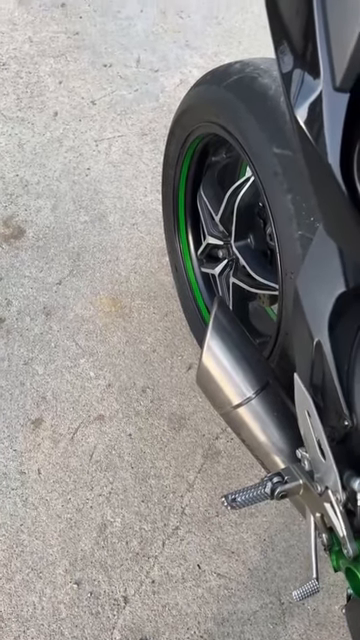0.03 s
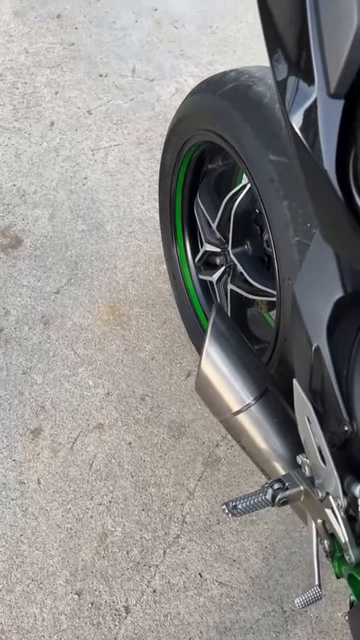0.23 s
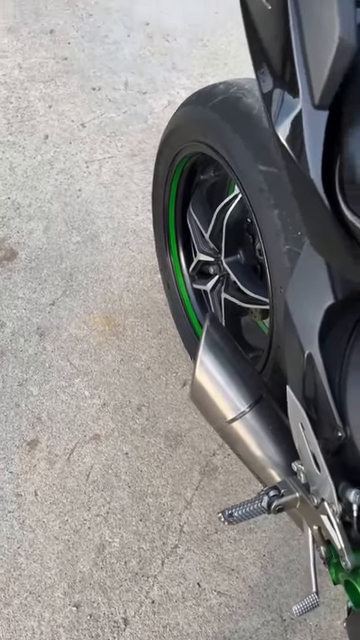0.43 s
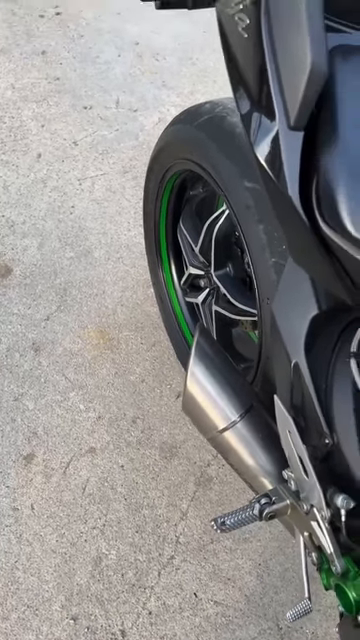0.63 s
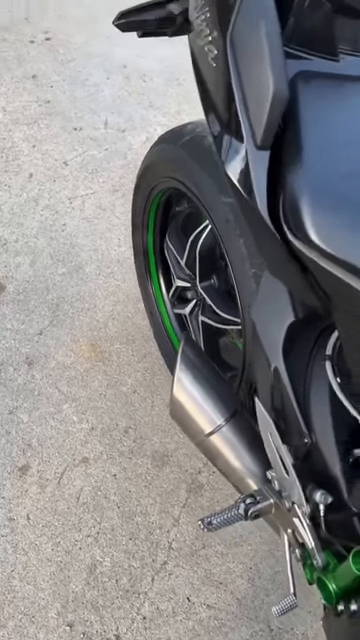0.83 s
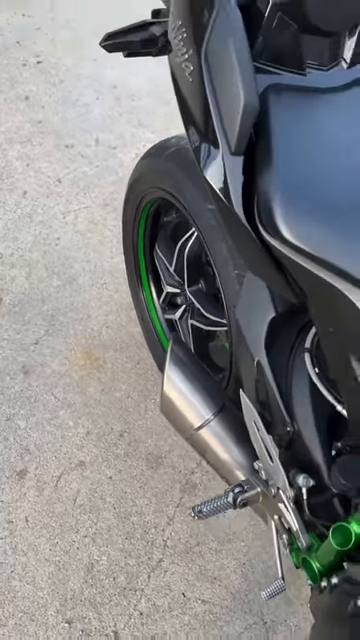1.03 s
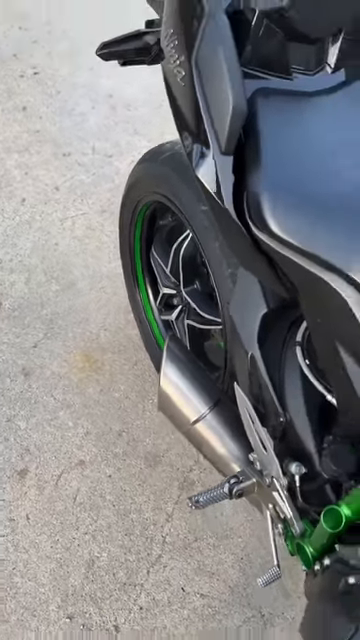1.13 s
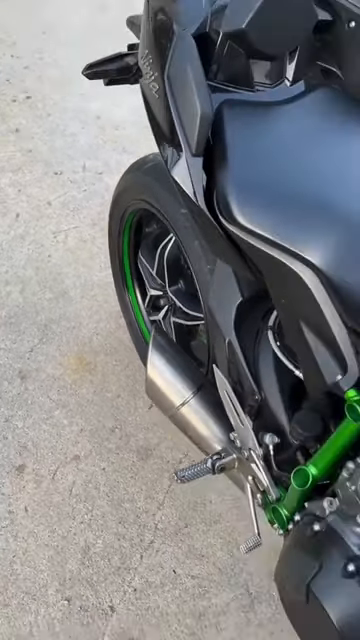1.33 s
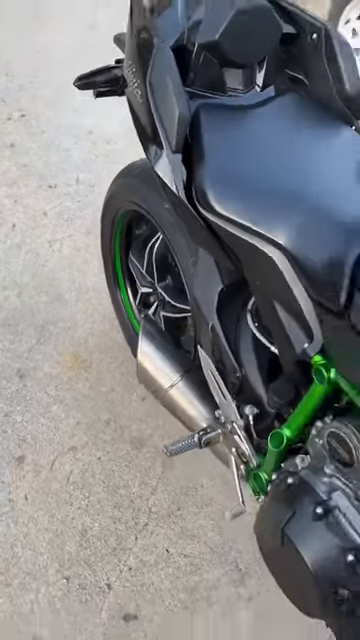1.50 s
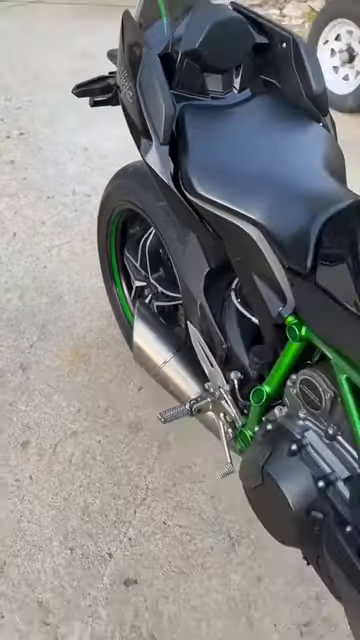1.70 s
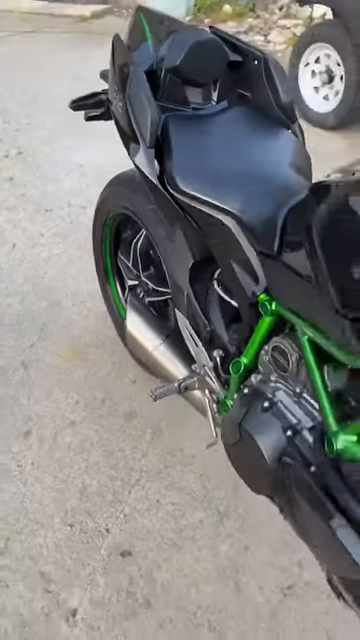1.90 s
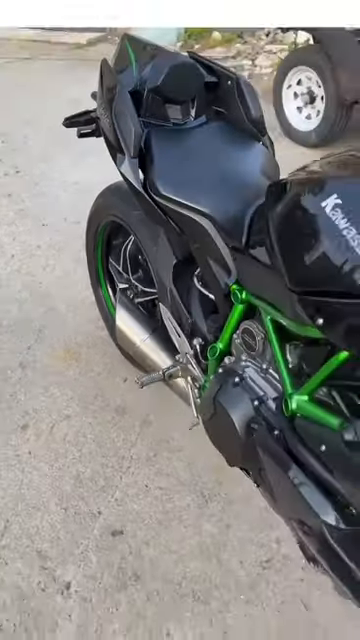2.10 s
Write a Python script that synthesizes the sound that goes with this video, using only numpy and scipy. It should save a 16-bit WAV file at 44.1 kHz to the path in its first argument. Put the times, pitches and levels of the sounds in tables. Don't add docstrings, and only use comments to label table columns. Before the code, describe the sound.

A four-cylinder motorcycle idles quietly close to a phone, is blipped into a short, hard, raspy rev, hums briefly as the throttle shuts, pops one loud backfire, then burbles down and fades in an open concrete yard.

```python
import sys
import numpy as np
from scipy import signal
from scipy.io import wavfile
from scipy.ndimage import uniform_filter1d

SR = 44100
rng = np.random.default_rng(int(sys.argv[2]) if len(sys.argv) > 2 else 0)


def wav_record(signal):
    frames = np.transpose(np.atleast_2d(signal))
    bounded = np.clip(frames, -1, 1)
    quanta = np.round(bounded * 32767).astype(np.int16)
    wavfile.write(sys.argv[1], SR, quanta)


def gain_from_decibels(decibels):
    exponent = np.asarray(decibels, float) / 20
    return 10 ** exponent


N = 94815

OPEN_S, SHUT_S = 0.215, 0.389
CUT_S, RELIGHT_S = 0.414, 0.65


def evened(x):
    return x / np.sqrt(np.mean(x ** 2) + 1e-20)


def read(points, hz):
    f, value = np.transpose(points)
    return np.interp(np.log(hz + 1), np.log(f + 1), value)


def between(start_s, end_s, edge_s):
    t = np.arange(N) / SR
    rise = np.clip((t - start_s) / edge_s + .5, 0, 1)
    fall = np.clip((end_s - t) / edge_s + .5, 0, 1)
    return rise * fall


def resonate(x, hz, width):
    turn = np.exp(2j * np.pi * np.cumsum(hz * np.ones(len(x))) / SR)
    r = np.exp(-np.pi * width / SR)
    return 2 * (turn * signal.lfilter([1 - r], [1, -r], x / turn)).real


def resonate_twice(x, hz, width):
    return resonate(resonate(x, hz, width), hz, width)


def noise(points, patchy_db):
    frames, hz = N // 128 + 5, np.fft.rfftfreq(512, 1 / SR)
    real, imag, patches = rng.standard_normal((frames, 257, 3)).T
    patches = uniform_filter1d(patches, size=5, axis=0)
    patches = evened(uniform_filter1d(patches, size=16, axis=1))
    gain = gain_from_decibels(read(points, hz)[:, None] + patchy_db * patches)
    return evened(signal.istft((real + 1j * imag) * gain, nperseg=512, noverlap=384)[1][:N])


def drift(size):
    return evened(uniform_filter1d(uniform_filter1d(rng.standard_normal(N), size), size))


# time in seconds, firing rate in Hz, then levels in dB of the firing tone,
# the even burns, the uneven burns and the machinery.
BLIP = [(0, 68.34, -35, -26.5, -31, -52.5), (.15, 78.56, -35.5, -65, -27.5, -58),
        (.2, 106.9, -29, -25.5, -20, -53.5), (.232, 131.4, -21.5, -22, -12, -44.5),
        (.296, 192.7, -18, -18, -16, -37.5), (0.327, 219.3, -18.5, -13.5, 1, -34.5),
        (.372, 246.2, -18.5, -20.5, -28, -42), (0.393, 234.8, -19.5, -45, -0.5, -43),
        (.45, 224.2, -22, -29, -45, -41.5), (0.638, 185.5, -21.5, -41.5, -20.5, -50),
        (.69, 169.4, -29, -33.5, -32.5, -48), (.8, 151.5, -31.5, -35, -30.5, -49),
        (1.0, 124.1, -38, -40, -29, -54), (1.31, 95.4, -40.5, -45, -37, -60.5),
        (1.7, 63.65, -36.5, -46, -46.5, -66.5), (1.884, 59.4, -34, -50.5, -55, -67.5),
        (1.92, 56.7, -46, -62, -49.5, -68.5), (2.15, 46.4, -49, -60, -81, -72)]


def control(column):
    table = np.array(BLIP)
    return np.interp(np.arange(N) / SR, table[:, 0], table[:, column])


# multiple of the firing rate, level in dB.
BURN_OVERTONES = [(2, 1.5), (3, -1.5), (4, -4), (5, -8), (6, -10), (7, -13.5), (8, -10.5), (9, -15.5),
                  (10, -16), (1.5, -12.5), (2.5, -16), (3.5, -4)]
# frequency in Hz, gain in dB.
PIPE_GAIN = [(180, -5.5), (400, 0.5), (600, 0), (750, -13.5), (950, -6.5), (1150, -12), (1400, -1.5),
             (2500, -35)]
# frequency in Hz, gain in dB.
SHUT_PIPE_GAIN = [(200, 2.5), (290, -4.5), (375, 3.5), (450, -10), (520, 1.5), (580, 2), (700, 1)]
# multiple of the firing rate, level in dB.
PUMP_ORDERS = [(.75, -33.5), (1.25, -42.5), (1.5, -24.5), (1.75, -43), (2, -30), (2.25, -35.5),
               (2.5, -25.5), (2.75, -39.5), (3, -49), (3.5, -42), (3.75, -41.5), (4, -53), (4.5, -42),
               (5, -52), (5.5, -50), (6.5, -43.5), (7, -43), (8.5, -42.5)]


def orders(hz, turns):
    switch_s, pump_fade_db = 0.032, -10
    tone = gain_from_decibels(control(2) + drift(400)) * np.cos(2 * np.pi * turns)
    waver_db = 2.5 - 1.3 * between(OPEN_S, SHUT_S, 0.028)
    dull_db = 0.48 * (1 - between(OPEN_S, SHUT_S, 0.018))
    shut = between(RELIGHT_S, N / SR, switch_s)
    burn = 0
    for k, db in BURN_OVERTONES:
        pipe_db = read(PIPE_GAIN, k * hz) + shut * read(SHUT_PIPE_GAIN, k * hz)
        level = gain_from_decibels(db + pipe_db - dull_db * k + waver_db * drift(800))
        phase = .5 * (k - 2) ** 2 + 1.2 * (k > 2)
        burn = burn + level * np.cos(2 * np.pi * k * turns + phase)
    pump = 0
    for k, db in PUMP_ORDERS:
        pump = pump + gain_from_decibels(db + 2 * drift(900)) * np.cos(2 * np.pi * (k * turns + rng.random()))
    cut = between(CUT_S, RELIGHT_S, switch_s)
    fade_db = pump_fade_db * (np.arange(N) / SR - CUT_S) / (RELIGHT_S - CUT_S)
    burn = burn * gain_from_decibels(control(3)) * (1 - cut)
    pump = pump * cut * gain_from_decibels(np.clip(fade_db, -20, 0))
    return np.sqrt(2) * (tone + burn + pump)


# frequency in Hz, width in Hz, gain in dB.
SILENCER_MODES = [(62.3, 46, 4.5), (120, 68, -4.5), (200, 123, 1), (267, 264, -26.5), (379.7, 48.6, 6),
                  (462, 37, -5), (561.6, 55, -3), (770, 91, -34), (965, 61, -21), (1320, 61, -26),
                  (1840, 90, -52), (2420, 480, -41.5)]


def silencer(x):
    out = 0
    for k, (hz, width, db) in enumerate(SILENCER_MODES):
        out = out + (-1) ** k * gain_from_decibels(db) * resonate_twice(x, hz, 0.97 * width)
    return out


def puffed(pulses):
    grit_level, decay_s = 0.39, 0.0045
    tail = np.exp(-np.arange(800) / SR / decay_s)
    puff = rng.standard_normal(N) * np.convolve(pulses, tail)[:N] / np.sqrt(decay_s * SR / 2)
    return silencer(pulses + grit_level * puff)


# time in seconds, peak in dB, ringing pitch in Hz.
LATE_BURNS = [(0.084, -38, 423), (0.643, -31, 186), (0.652, -14.5, 181), (.787, -16, 266),
              (0.814, -13, 305), (0.836, -13, 550), (0.867, -14, 442.8), (.881, -24.5, 557),
              (.903, -15, 574), (0.943, -15.5, 394), (0.96, -16, 178.1), (1.01, -16.5, 348.2),
              (1.024, -15, 370), (1.071, -24.5, 531.3), (1.112, -21.5, 397.5), (1.141, -23, 444.3),
              (1.205, -22.5, 403), (1.255, -20.5, 374), (1.295, -26, 386), (1.326, -23, 375),
              (1.392, -21, 389), (1.417, -33, 362), (1.474, -22.5, 357.8), (1.538, -25, 372),
              (1.566, -29.5, 378.2), (1.631, -29, 302), (1.744, -29.5, 372), (1.886, -27.5, 200),
              (2.032, -30.5, 215.8), (2.057, -32, 126.3), (2.076, -28.5, 120)]


def burble(hz, turns):
    scatter_db, jitter_cycles, late_db = 3, .11, -10
    at = np.flatnonzero(np.diff(np.floor(turns)))
    jitter, strength = rng.standard_normal((2, len(at)))
    moved = at + (jitter_cycles * jitter * SR / hz[at]).astype(int)
    train, late = np.zeros(N), np.zeros(N)
    train[np.clip(moved, 0, N - 1)] = gain_from_decibels(scatter_db * strength) / np.sqrt(hz[at])
    for s, db, _ in LATE_BURNS:
        late[round(s * SR)] = gain_from_decibels(db + late_db)
    uneven = evened(puffed(train))
    uneven = uneven - resonate(uneven, hz, 30) - resonate(uneven, 2 * hz, 32)
    open_db = -12 * between(OPEN_S, SHUT_S, 0.044)
    cut_db = -15 * between(SHUT_S, RELIGHT_S, 0.086)
    unit_peak = abs(silencer(signal.unit_impulse(2000))).max()
    return uneven * gain_from_decibels(control(4)) * gain_from_decibels(open_db + cut_db) + puffed(late) / unit_peak


# frequency in Hz, level in dB.
METAL_COLOUR = [(600, -3.5), (955, -9.5), (1130, -15), (1800, -14), (3100, -19.5), (5000, -31.5),
                (5960, -26), (13100, -40.5)]


def metal_hiss():
    return gain_from_decibels(control(5) + 10.5) * noise(METAL_COLOUR, patchy_db=3)


# frequency in Hz, level in dB.
FLOOR_COLOUR = [(25, -6), (60, 1), (130, 9), (230, -3.5), (450, -27), (1200, -32), (3000, -36.5),
                (13000, -62)]


def outdoor_floor():
    return gain_from_decibels(-46) * noise(FLOOR_COLOUR, patchy_db=1)


def yard(x):
    t60_s = 0.33
    at = np.arange(400, SR // 2 - 20, 20)
    taps = np.zeros(SR // 2)
    signs = rng.choice([-1., 1.], len(at))
    taps[at + rng.integers(0, 20, len(at))] = signs * gain_from_decibels(-60 * at / SR / t60_s)
    taps = signal.lfilter([1], [1, -.6], taps)
    return signal.fftconvolve(x, taps / np.linalg.norm(taps))[:N]


def putts():
    ring_db, ring_s, spit_db, spit_s = -1.5, 0.0074, -21, 0.0042
    out, t = np.zeros(N + 3000), np.arange(3000) / SR
    low_pass = signal.butter(2, 2200, fs=SR)
    for s, db, hz in LATE_BURNS:
        gas = signal.lfilter(*low_pass, rng.standard_normal(3000))
        ring = np.sin(2 * np.pi * hz * t) * np.minimum(t / 0.0026, 1) * np.exp(-t / ring_s)
        spit = gas * np.exp(-t / spit_s)
        out[round(s * SR):][:3000] -= gain_from_decibels(db) * (gain_from_decibels(ring_db) * ring + gain_from_decibels(spit_db) * spit)
    return out[:N]


# frequency in Hz, width in Hz, level in dB.
TAILPIPE_BANDS = [(803, 120, -4), (1005, 69, 0), (1480, 120, -1), (1813, 125, -1), (2155, 110, -6.5),
                  (2370, 150, -8), (2850, 570, -13.5)]
# frequency in Hz, level in dB.
RASP_COLOUR = [(410, -32), (700, -14), (1170, -9), (1500, 6.5), (1630, -8.5), (2350, -5), (3620, -46),
               (4450, -11.5), (13100, -77)]
# frequency in Hz, level in dB.
OVERRUN_COLOUR = [(500, -13), (800, 3.5), (1000, 2), (1180, -8.5), (1450, -1), (1620, -16), (1800, -2),
                  (2600, -14), (4000, -37)][1:]


def gas_rasp(turns):
    gate_depth, pulse_share = 0.8, 0.45
    gate = 1 - gate_depth + 2 * gate_depth * np.exp(-(turns % 1) / 1.9)
    slaps = evened(np.diff(np.floor(turns), prepend=0) * gain_from_decibels(2 * rng.standard_normal(N)))
    drive = pulse_share * slaps + (1 - pulse_share) * gate * rng.standard_normal(N)
    bands = 0
    for k, (hz, width, db) in enumerate(TAILPIPE_BANDS):
        bands = bands + (-1) ** k * gain_from_decibels(db) * resonate_twice(drive, hz, width) / np.sqrt(width)
    load = evened(bands) + gain_from_decibels(-8) * noise(RASP_COLOUR, patchy_db=3.5) * gate
    load = load * gain_from_decibels(control(5) + 10.5) * between(0.217, SHUT_S - .01, 0.0046)
    overrun = gain_from_decibels(-37.5) * gate * noise(OVERRUN_COLOUR, patchy_db=2)
    return load + overrun * between(SHUT_S + 0.037, RELIGHT_S + 0.033, 0.054)


# start in seconds, end in seconds, pitch in Hz, level in dB.
PIPE_SWELLS = [
    (0.26, 0.346, 62, -27),
    (0.662, 0.669, 72, -26),
    (0.769, 0.837, 62, -34),
    (0.884, 0.969, 62, -37),
    (1.12, 1.275, 62, -34),
    (1.533, 1.587, 63.3, -35),
]


def booms():
    t, out = np.arange(N) / SR, 0
    for start, end, hz, db in PIPE_SWELLS:
        tone = np.sin(2 * np.pi * (hz * t + rng.random()))
        out = out + gain_from_decibels(db + 4) * between(start, end, 0.017) * tone
    return out


# frequency in Hz, level in dB.
CRACK_COLOUR = [(1500, -4), (2400, -7), (3200, -6), (8000, -7), (12500, -21), (13500, -55)]
# frequency in Hz, level in dB, t60 in seconds.
SHELL_MODES = [(760, -17, .016), (996, -12.5, .026), (1300, -15, .022), (1600, -24, .015),
               (1980, -21, .022), (2410, -17, .022), (3110, -31, .02), (3680, -30, .012)]
# delay in seconds, level in dB.
POP_ECHOES = [
    (.0135, -19.5),
    (.021, -31),
    (0.0316, -19),
]


def backfire():
    t = np.maximum(np.arange(N) / SR - .7548, 0)
    start_hz, end_hz, sag_s = 805, 250, .0018
    hz = end_hz + (start_hz - end_hz) * np.exp(-t / sag_s)
    rise_s, top_s, fall_s = .0004, .0024, .003
    swell = np.minimum(t / rise_s, 1) * np.exp(-((t - top_s) / fall_s) ** 2)
    blast = -gain_from_decibels(-4) * swell * np.sin(2 * np.pi * np.cumsum(hz * (t > 0)) / SR)
    heave_hz, heave_s = 83, .009
    heave = (t / heave_s) ** 2 * np.exp(2 - 2 * t / heave_s) * np.sin(2 * np.pi * heave_hz * t)
    blast = blast - gain_from_decibels(-17) * heave
    crack = gain_from_decibels(-29.5) * noise(CRACK_COLOUR, patchy_db=-1.5)
    crack = crack * np.minimum(t / 0.000471, 1) * np.exp(-t / 0.0057)
    late = np.maximum(t - .0004, 0)
    for f, db, t60 in SHELL_MODES:
        crack = crack + gain_from_decibels(db - 60 * late / t60) * np.sin(2 * np.pi * f * late)
    tick = gain_from_decibels(-38.5) * rng.standard_normal(N) * np.minimum(t / .0008, 1) * np.exp(-t / 0.0034)
    dull = signal.lfilter([.15], [1, -.85], blast + crack)
    out = blast + crack + tick
    for s, db in POP_ECHOES:
        out = out + gain_from_decibels(db) * np.roll(dull, round(s * SR))
    return out


# start in seconds, end in seconds, start pitch in Hz, end pitch in Hz, level in dB.
GEAR_WHISTLES = [
    (0.899, 1.052, 3110, 3085, -58.5),
    (1.075, 1.213, 3000, 3090, -63.5),
    (1.242, 1.438, 2239, 2206, -63.5),
    (1.447, 1.601, 1178, 1034, -65.5),
    (1.812, 1.939, 1610, 1510, -65.5),
]


def gear_whine():
    t, out, width_hz = np.arange(N) / SR, 0, 100
    for start, end, start_hz, end_hz, db in GEAR_WHISTLES:
        hz = np.interp(t, [start, end], [start_hz, end_hz])
        whistle = evened(resonate_twice(rng.standard_normal(N), hz, width_hz))
        out = out + gain_from_decibels(db) * between(start, end, 0.036) * whistle
    return out


def scene():
    hz = control(1)
    turns = np.cumsum(hz) / SR
    rough = burble(hz, turns) + putts() + backfire()
    rough = rough + gas_rasp(turns) + metal_hiss() + gear_whine()
    direct = booms() - orders(hz, turns) + rough
    return (direct + gain_from_decibels(-20.5) * yard(rough) + outdoor_floor())[None]


def roll_off(x):
    return signal.sosfilt(signal.butter(12, 13240, fs=SR, output="sos"), x)


def record(dry):
    squash = .8
    high_pass = signal.butter(2, 36, "high", fs=SR, output="sos")
    cut = signal.sosfilt(high_pass, dry)
    return roll_off(np.tanh(squash * cut) / squash)


dry = scene()
out = record(dry)
wav_record(out)
```